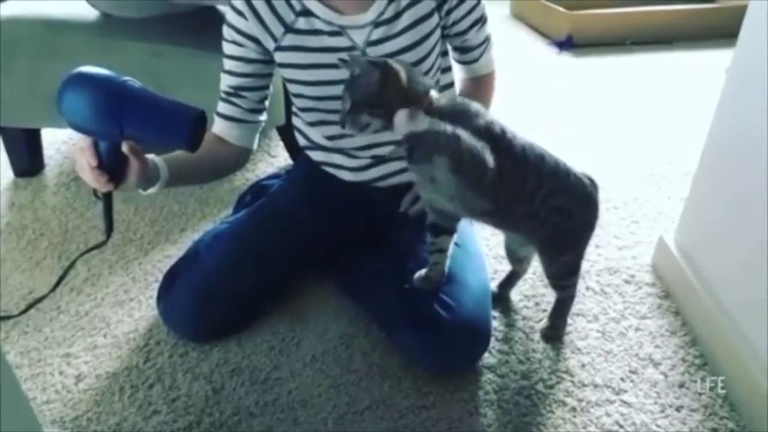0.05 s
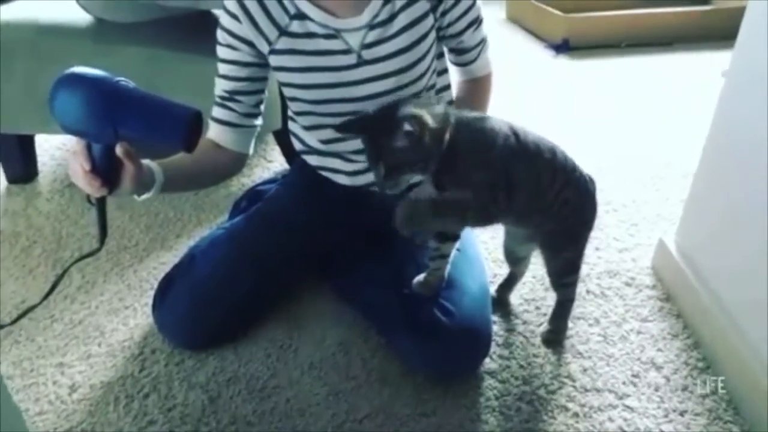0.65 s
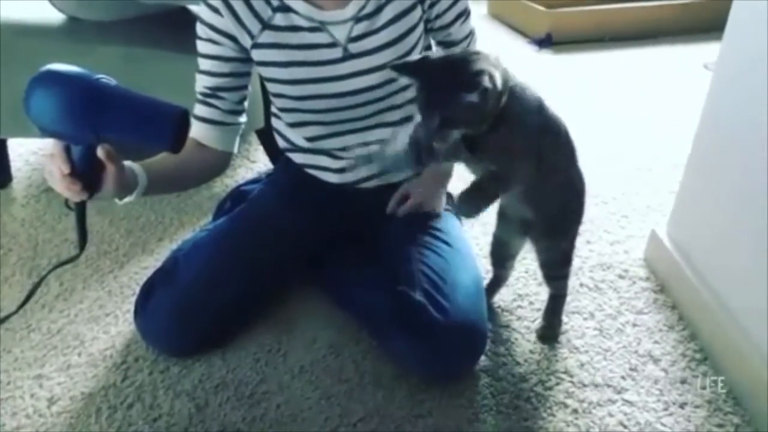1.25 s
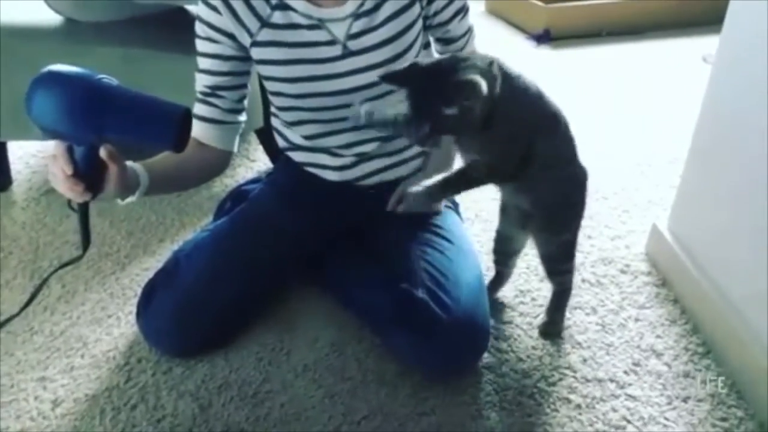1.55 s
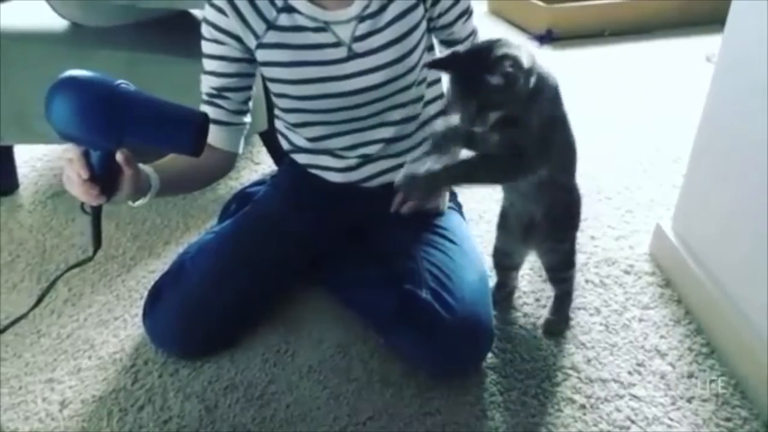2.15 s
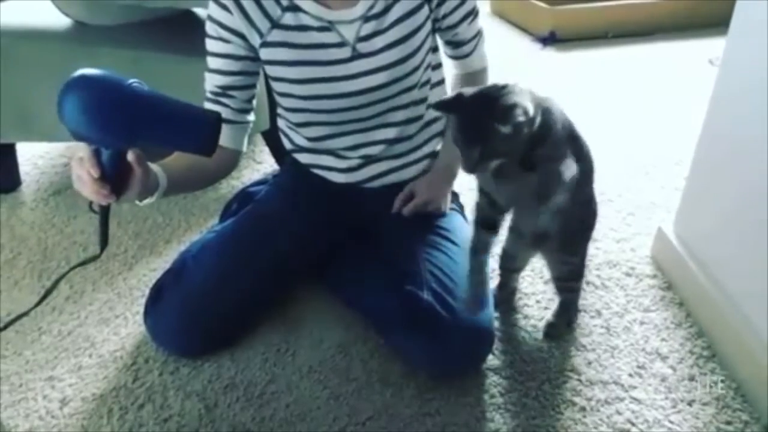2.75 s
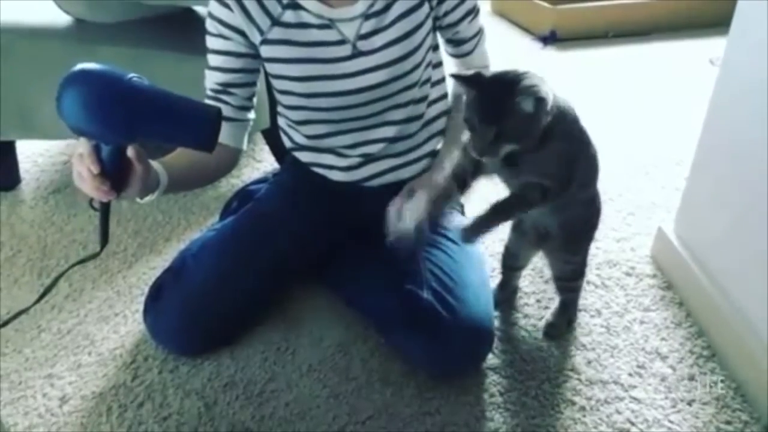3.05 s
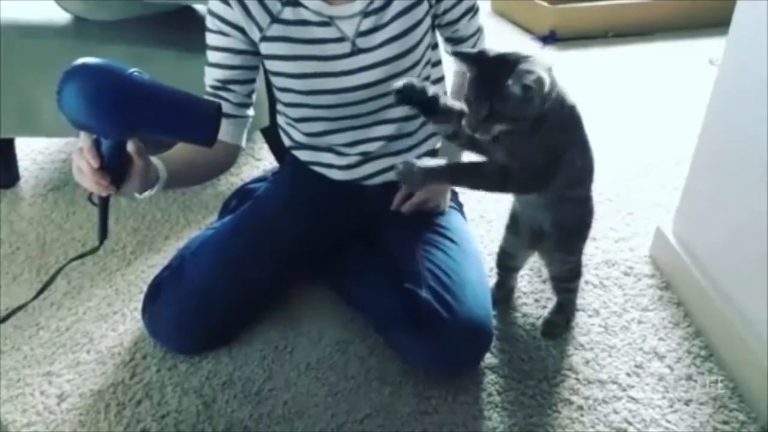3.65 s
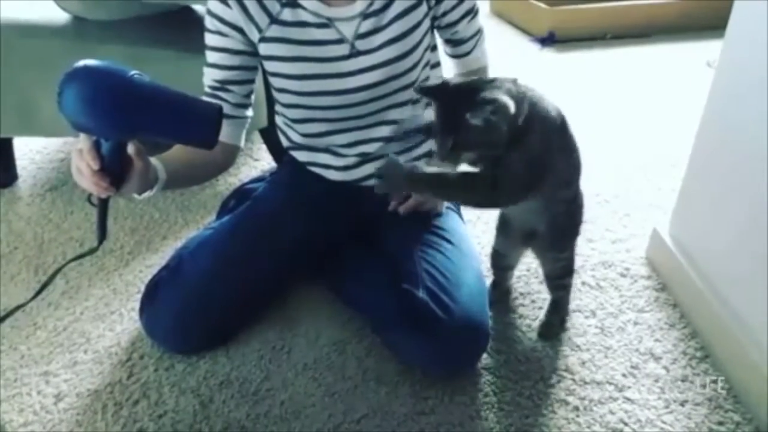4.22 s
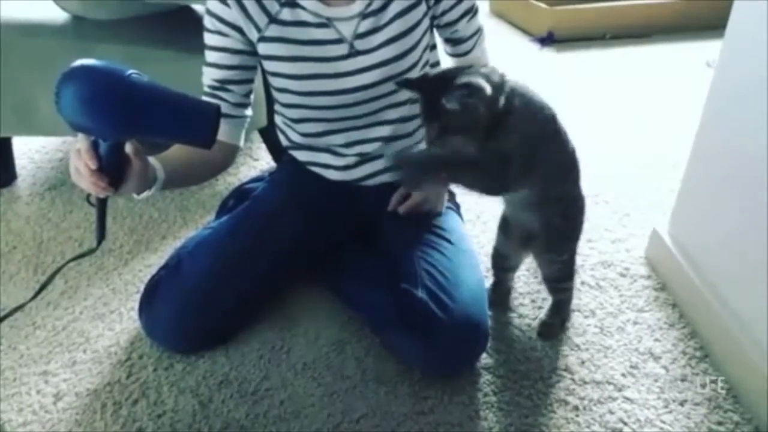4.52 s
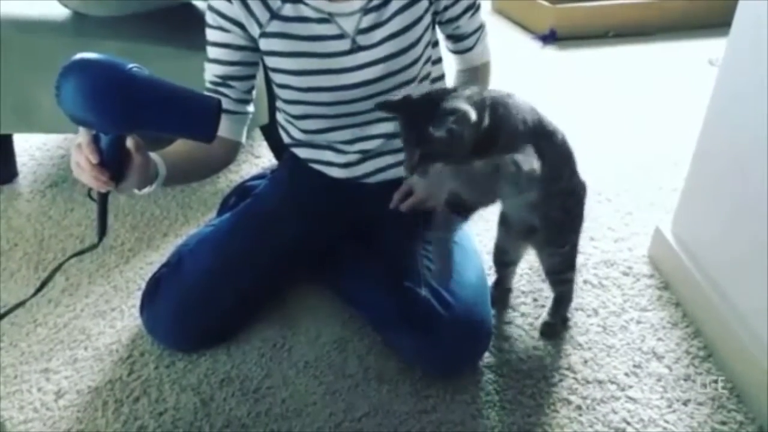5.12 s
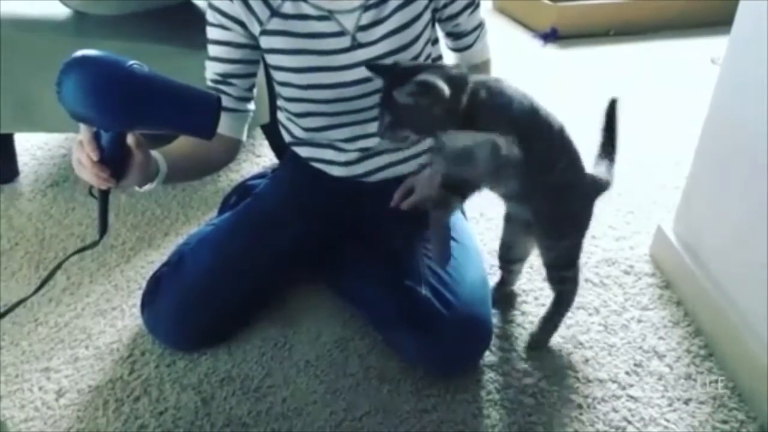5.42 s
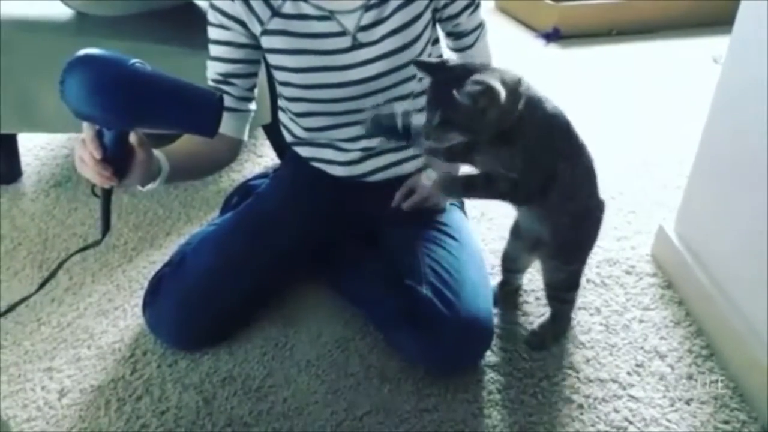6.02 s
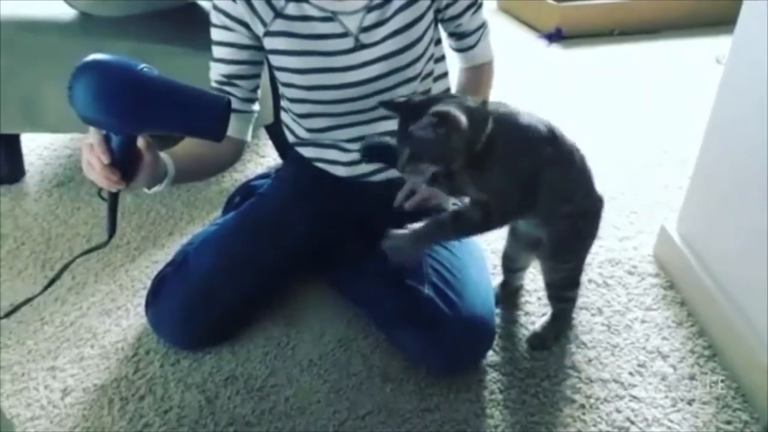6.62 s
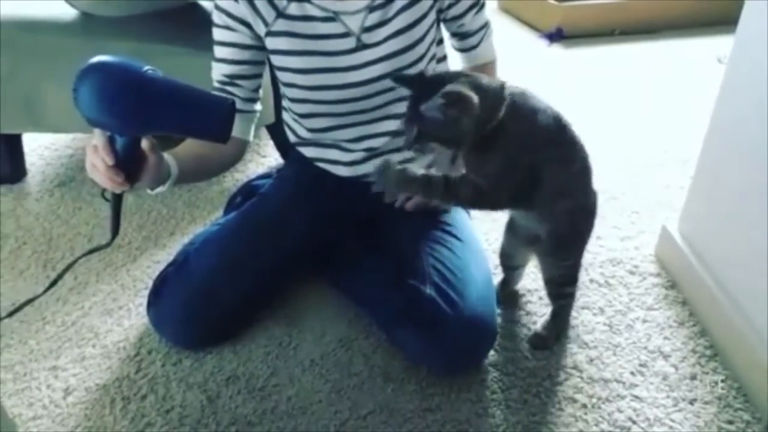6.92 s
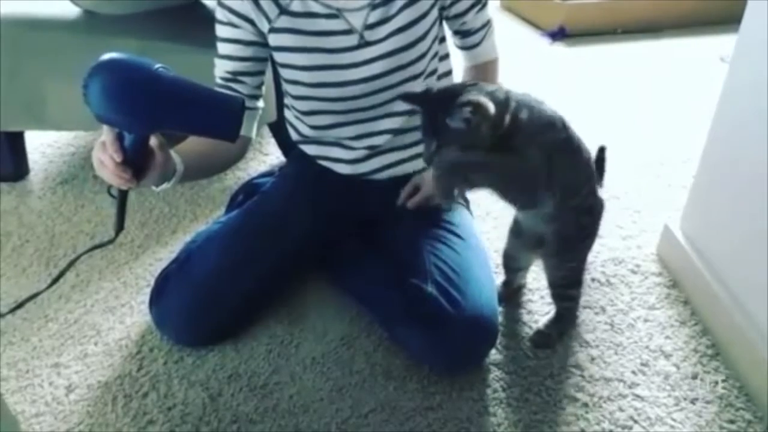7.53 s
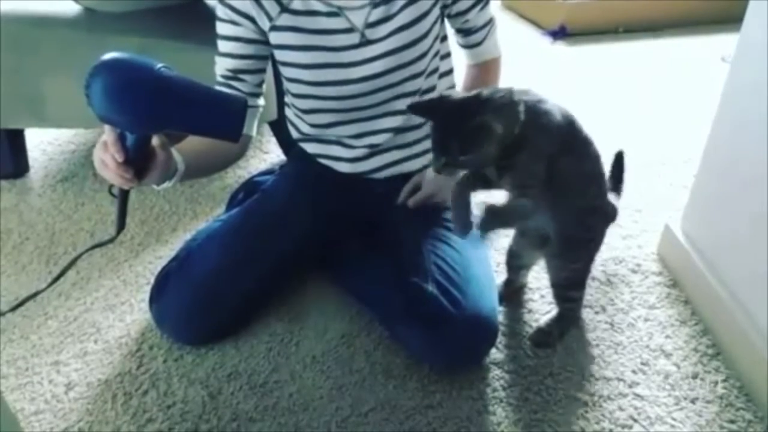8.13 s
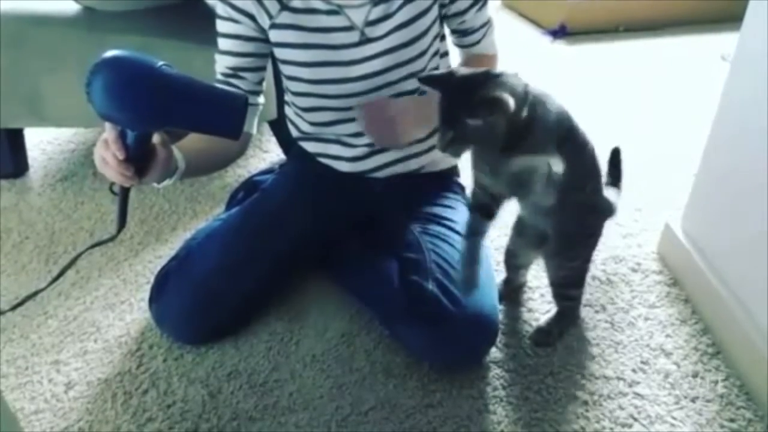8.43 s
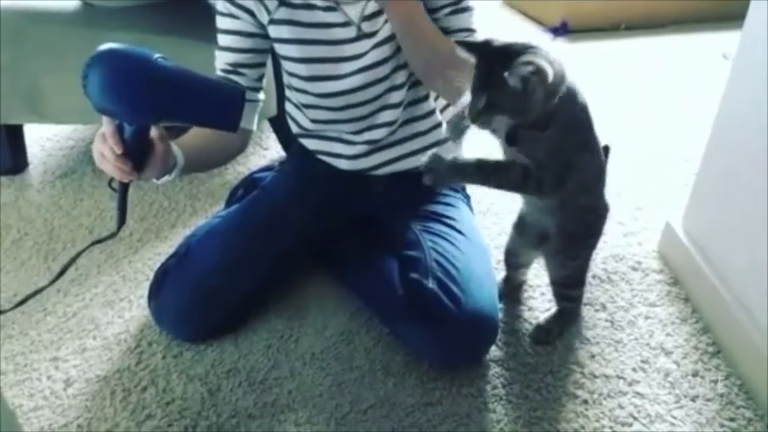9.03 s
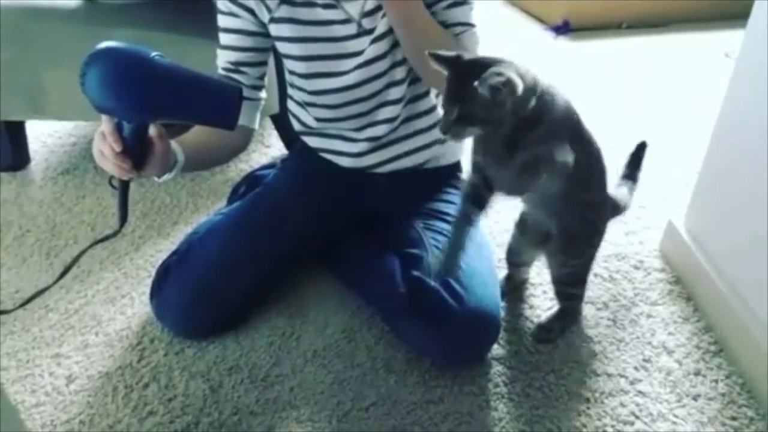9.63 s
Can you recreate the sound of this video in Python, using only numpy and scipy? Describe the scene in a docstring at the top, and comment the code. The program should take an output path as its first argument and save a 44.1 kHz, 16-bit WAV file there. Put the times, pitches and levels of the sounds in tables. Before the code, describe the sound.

Heard in mono from about a step away in a carpeted room, a hair dryer blows a constant, hissing rush of air from start to finish. A thin whine holds its pitch but wavers in strength, with a faint motor buzz and slight low flutters beneath it. Past the middle comes a single brief, soft swish, and the rush shifts slightly in tone as the dryer keeps running.

```python
"""A handheld hair dryer

A dryer runs steadily in a carpeted room, heard in mono from a step away. Turbulent air roars in its
barrel and hisses through its grille. One shaft drives the seven-bladed fan, which adds a thin whine
whose partials swell and fade, and the motor, which buzzes faintly. One short swish passes, and a faint
bass flickers under the rush."""
import sys
import numpy as np
from scipy import signal
from scipy.fft import rfft, irfft, next_fast_len
from scipy.io import wavfile
from scipy.ndimage import uniform_filter1d, map_coordinates

SR = 44100
rng = np.random.default_rng(int(sys.argv[2]) if len(sys.argv) > 2 else 0)


def store_pcm(level_fs):
    """Save levels as 16-bit WAV."""
    pcm = np.round(np.clip(level_fs, -1, 1) * 32767).astype(np.int16)
    wavfile.write(sys.argv[1], SR, np.atleast_2d(pcm).T)


N = 430857


def air_rush(roar_db=-38, hiss_db=-30.5):
    """Turbulent flow radiates broadband noise: roar and hiss add, each wavering slightly in level."""
    roar, hiss = barrel_roar(), grille_hiss()
    rush = amp(roar_db + 0.25 * wobble(12)) * roar + amp(hiss_db + 0.22 * wobble(12)) * hiss
    rush = drifting_midrange(nozzle_turn(rush))
    return fluttering_edge(rush, edge_hz=492.6, swing_hz=77.4, slope_hz=7.4)


# Broad spectrum of the roar. Each row: frequency in Hz, relative spectral level in dB.
ROAR_SPECTRUM = [(200.0, -42), (320.0, -6), (400.0, -10.5), (490.0, -6.5), (600.0, -2), (780.0, -5),
                 (900.0, -9), (1300.0, -5.5), (1600.0, -7), (2400.0, -32.5), (5000.0, -73)]
# Air resonances of the barrel. Each row: centre in Hz, width in Hz, lift in dB.
BARREL_MODES = [(605, 30, 1.8), (660, 80, 6.2), (705, 25, 2), (738, 24, 8.8), (778, 28, 5.3),
                (852, 26, 7.6), (940, 14, 2), (965, 16, 4), (1028, 22, 6.6), (1087, 19, 8.3), (1208, 45, 4),
                (1262, 18, 3.8), (1316, 20, 7.3), (1356, 13, 6), (1389, 14, 6), (1505, 30, 1.5),
                (1575, 35, 4.8)]

def barrel_roar():
    """Resonance: the air in the barrel reinforces the flow noise near its natural frequencies."""
    return eddies(noise(ROAR_SPECTRUM, BARREL_MODES), depth_db=1.5, frames=12)


# Broad spectrum of the hiss. Each row: frequency in Hz, relative spectral level in dB.
HISS_SPECTRUM = [(400.0, -80.0), (1000.0, -19.4), (1500.0, -6.3), (1800.0, 0.3), (2600.0, -0.9),
                 (3400.0, -2.3), (4700.0, -3.9), (7000.0, -4.6), (8550.0, -4.6), (8800.0, -8.1),
                 (11800.0, -10.9), (13300.0, -14.4), (14200.0, -18.6), (15400.0, -28.5)]
# Air resonances of the grille and dips between them. Each row: centre in Hz, width in Hz, gain in dB.
GRILLE_MODES = [(1470, 130, -1.3), (1760, 100, 1.3), (2007, 18, 4), (2066, 24, 6), (2160, 55, 3.6),
                (2315, 55, 3.2), (2405, 50, -2), (2495, 50, 1.8), (2610, 40, 1), (2730, 90, 2.7),
                (2885, 50, -1.5), (2989, 85, 4.6), (3130, 60, 3.8), (3215, 55, 2.3), (3330, 90, -1.8),
                (3619, 95, 3.2), (3950, 90, 2), (4100, 130, 4), (4205, 100, 3.7), (4330, 50, 1.8),
                (4600, 150, .8), (5170, 200, 1.5), (6020, 280, 2.3), (6520, 160, 1.2)]

def grille_hiss():
    """Turbulence at the grille makes bright noise, coloured by resonances and nearby reflections."""
    hiss = reflections(noise(HISS_SPECTRUM, GRILLE_MODES), echo_db=-24, count=4)
    return eddies(hiss, depth_db=1.0, frames=14)


# Drift of the hand that holds the dryer. Each row: time in seconds, sideways shift in metres.
HAND_DRIFT = [(0, 0), (.7, -.01), (1.1, -.04), (1.6, -.05), (2.4, .02), (6.3, .03), (7.8, .055),
              (9.77, .06)]
SOUND_M_PER_S = 343

def reflections(x, echo_db, count):
    """Comb filtering: weak echoes interfere with the direct sound, their delays moving with the hand."""
    t = np.arange(N) / SR
    shift_m, = curves(HAND_DRIFT)
    paths = zip(rng.uniform(.001, .006, count), rng.uniform(-1, 1, count))
    delays_s = [delay + lean * shift_m / SOUND_M_PER_S for delay, lean in paths]
    echoes = sum(map_coordinates(x, [(t - delay) * SR], mode="mirror") for delay in delays_s)
    return unit(x + amp(echo_db) * echoes)


def eddies(x, depth_db, frames):
    """Random amplitude modulation: eddies swell and thin each narrow band on its own."""
    spectra = signal.stft(x, nperseg=512)[2]
    swell = uniform_filter1d(rng.standard_normal(spectra.shape), size=3, axis=0)  # across frequency
    swell = uniform_filter1d(swell, size=frames, axis=1)  # across time
    return unit(signal.istft(spectra * amp(depth_db * unit(swell)), nperseg=512)[1][:N])


# Bands that change as the nozzle turns. Each row: centre in Hz, width in Hz, gain at full turn in dB.
NOZZLE_BANDS = [(755, 110, -1.2), (1490, 110, -1.8), (2090, 160, 1.8), (2410, 80, -1.8), (2650, 220, 1.7),
                (2950, 120, -1.5), (3200, 130, 1.5), (4440, 120, -1.5), (4870, 200, -1.8), (5130, 220, 2),
                (5500, 220, -2.5), (6120, 150, 1.3), (6420, 140, -1.5)]
# Aim of the nozzle. Each row: time in seconds, signed share of the full turn.
NOZZLE_AIM = [(0, -.3), (.8, -.6), (2.2, 0), (6.3, .15), (7.4, 1), (9.77, 1)]

def nozzle_turn(x):
    """Directivity: as the nozzle turns, some resonances stand out and the valleys between deepen."""
    turn, = curves(NOZZLE_AIM)
    return x + turn * filtered(x, lambda hz: amp(peaks_db(NOZZLE_BANDS, hz)) - 1)


# Colour of the rush. Each row: time in seconds, low-mid gain in dB, high-mid gain in dB.
MIDRANGE_GAINS = [(0, -1.7, 0), (1.5, -1.5, -0.3), (3.3, -0.9, -1.2), (4.5, -0.4, -1), (5.8, -1.3, -1),
                  (6.9, -0.5, -0.9), (7.5, 1, -1.5), (8.4, 1, -1.5), (9.77, 0.2, -2)]

def drifting_midrange(x):
    """Spectral balance shifts slowly: the lower midrange fills out as the upper thins."""
    low_mid_db, high_mid_db = curves(MIDRANGE_GAINS)
    x = band_gain(x, low_mid_db, centre_hz=1170, width_hz=650)
    return band_gain(x, high_mid_db, centre_hz=2000, width_hz=1200)


def fluttering_edge(x, edge_hz, swing_hz, slope_hz):
    """High-pass filtering: the roar falls away exponentially below a cutoff that flutters at random."""
    hz, t, spectra = signal.stft(x, SR, nperseg=1024, noverlap=768)
    cutoff_hz = np.interp(t * SR, np.arange(N), edge_hz + swing_hz * wobble(28))
    gain = np.exp(-np.maximum(cutoff_hz - hz[:, None], 0) / slope_hz)
    return signal.istft(spectra * gain, SR, nperseg=1024, noverlap=768)[1][:N]


# Whine as the nozzle turns. Each row: time in seconds, rms levels of blade tone and octave in dB.
WHINE_LEVELS = [(0.0, -44, -45), (0.3, -43.3, -47), (0.7, -43.3, -60), (0.92, -41, -46), (1.2, -44, -39.7),
                (2.5, -45.4, -39.8), (2.85, -45.8, -41), (4.3, -44.8, -38.7), (4.75, -43.8, -40.6),
                (5.1, -46, -41), (5.85, -46.4, -39.8), (6.5, -45.3, -44.5), (6.8, -46.2, -40.3),
                (7.6, -45.8, -40), (7.95, -45.6, -36.5), (8.12, -45.2, -40.7), (8.6, -44.8, -39),
                (8.9, -47.5, -37.3), (9.25, -47, -37.7), (9.77, -48.8, -37.3)]
# Upper partials of the whine. Each row: multiple of the blade tone, level in dB relative to UPPER_DB.
UPPER_PARTIALS = [(3, 0), (4, 2), (5, -2), (6, -10), (7, -5)]
BLADES, UPPER_DB = 7, -56

def fan_whine(angle):
    """Blades chop the air at the blade-passing frequency; uneven inflow makes each harmonic waver."""
    blade_db, octave_db = curves(WHINE_LEVELS)
    partials = [(1, blade_db + 1.3 * wobble(12)), (2, octave_db + 0.85 * wobble(8))]
    partials += [(k, UPPER_DB + db + 1.9 * wobble(2.0)) for k, db in UPPER_PARTIALS]
    return sum(tone(k * BLADES * angle, db) for k, db in partials)


# Partials of the motor. Each row: multiple of the shaft speed, rms level in dB.
MOTOR_PARTIALS = [(4, -60), (5, -64), (11, -64), (29, -60), (30, -62), (31, -66), (32, -64), (34, -62),
                  (36, -66), (37, -65), (39, -65), (41, -64), (45, -66), (47, -66)]

def motor_buzz(angle):
    """Periodic rotation gives a line spectrum: weak, wavering harmonics of the shaft speed."""
    return sum(tone(k * angle, db + 1.2 * wobble(6.9)) for k, db in MOTOR_PARTIALS)


# Motor speed, sagging slightly. Each row: time in seconds, speed in turns per second.
SHAFT_SPEED = [(0, 271.3), (1.3, 271.6), (3.5, 271.32), (6.6, 271.4), (8.9, 271.2), (9.5, 270.9),
               (9.77, 270.87)]

def shaft_angle():
    """Phase is the integral of frequency: the nearly steady speed sums to an angle in radians."""
    speed = curves(SHAFT_SPEED)[0] + 0.034 * wobble(14)
    return 2 * np.pi * np.cumsum(speed) / SR


def swish():
    """Flow noise of a passing obstacle, probably a cat's paw in the jet: one soft, falling swish."""
    return puff(start=6.62, length=.125, db=-44, from_hz=5000, to_hz=3450, width_hz=900)


# Puffs of bass. Each row: start in seconds, length in seconds, rms level in dB, centre in Hz.
BASS_PUFFS = [(0.043, 0.035, -57, 177), (0.142, 0.04, -66, 232), (0.21, 0.045, -59, 145),
              (0.276, 0.04, -59, 185), (0.615, 0.04, -60, 195), (0.679, 0.042, -59, 180),
              (2.686, 0.048, -58, 184), (2.948, 0.032, -63, 124), (3.534, 0.07, -60, 195),
              (3.88, 0.043, -67, 171), (4.245, 0.062, -59, 151), (4.477, 0.047, -63, 242),
              (4.587, 0.042, -62, 113), (4.756, 0.045, -57, 128), (5.395, 0.041, -58, 178),
              (5.477, 0.065, -59, 140), (5.907, 0.044, -64, 143), (5.996, 0.039, -58, 195),
              (6.23, 0.042, -62, 107), (6.823, 0.046, -62, 172), (6.93, 0.041, -60, 166),
              (7.081, 0.046, -64, 118), (7.334, 0.036, -58, 200), (7.443, 0.065, -58, 124),
              (7.721, 0.047, -62, 109), (7.803, 0.042, -63, 114), (7.911, 0.12, -59, 150),
              (8.09, 0.052, -57, 185), (9.041, 0.042, -64, 219), (9.26, 0.031, -58, 180),
              (9.403, 0.05, -67, 266), (9.637, 0.052, -64, 213)]

def bass_flicker(width_share):
    """Constant relative bandwidth: the bass flickers in soft puffs of noise, the higher ones wider."""
    return sum(puff(start, length, db, hz, hz, width_share * hz) for start, length, db, hz in BASS_PUFFS)


# Spectrum of the background. Each row: frequency in Hz, relative spectral level in dB.
FLOOR_SPECTRUM = [(20, -4), (70, -2), (130, -9), (400, -9), (2000, -30)]

def noise_floor():
    """Stationary noise, low in pitch and nearly silent, lies under everything."""
    return amp(-107) * noise(FLOOR_SPECTRUM)


def amp(db):
    """Amplitude ratio of a level in decibels."""
    return 10 ** (np.asarray(db) / 20)


def unit(x):
    """Normalisation to an rms of 1."""
    return x / np.sqrt(np.mean(x ** 2) + 1e-20)


def curves(rows):
    """Linear interpolation: one value per sample for each column after the time."""
    times, *columns = np.transpose(rows)
    return [np.interp(np.arange(N) / SR, times, column) for column in columns]


def wobble(rate):
    """Slow random modulation: a spline through rate random knots a second."""
    return map_coordinates(rng.standard_normal(int(N * rate / SR) + 4), [np.arange(N) * rate / SR])


def tone(phase, db):
    """A sinusoid of rms level db with a random starting phase."""
    return np.sqrt(2) * amp(db) * np.sin(phase + rng.uniform(0, 2 * np.pi))


def peaks_db(resonances, hz):
    """Lorentzian resonance curves, summed in decibels at each frequency."""
    return sum(lift / (1 + (2 * (hz - centre) / width) ** 2) for centre, width, lift in resonances)


def filtered(x, response):
    """Linear filtering: the spectrum of x is multiplied by a frequency response."""
    size = next_fast_len(N + 8192)
    return irfft(rfft(x, size) * response(np.fft.rfftfreq(size, 1 / SR)), size)[:N]


def band_gain(x, db, centre_hz, width_hz):
    """Equalisation: one broad, flat-topped band rises or falls with a level curve."""
    band = filtered(x, lambda hz: np.exp(-(2 * (hz - centre_hz) / width_hz) ** 4))
    return x + (amp(db) - 1) * band


def noise(spectrum, resonances=()):
    """Source and filter: white noise shaped by a broad spectrum and resonances, at an rms of 1."""
    size = next_fast_len(N + 8192)
    hz = np.fft.rfftfreq(size, 1 / SR)
    points_hz, levels_db = np.transpose(spectrum)
    db = np.interp(np.log(hz + 1), np.log(points_hz), levels_db) + peaks_db(resonances, hz)
    return unit(irfft(rfft(rng.standard_normal(size)) * amp(db), size)[:N])


def puff(start, length, db, from_hz, to_hz, width_hz):
    """Quadrature modulation of a gliding carrier gives a band of noise that swells and fades once."""
    first, age = round(start * SR), np.arange(round(length * SR)) / SR
    knots = rng.standard_normal((2, 256))
    in_phase, quadrature = (map_coordinates(row, [age * width_hz], mode="mirror") for row in knots)
    phase = 2 * np.pi * np.cumsum(np.linspace(from_hz, to_hz, len(age))) / SR
    band = in_phase * np.cos(phase) + quadrature * np.sin(phase)
    burst = unit(np.sin(np.pi * age / length) * band)
    return np.pad(amp(db) * burst, (max(first, 0), N))[:N]


def scene():
    """Superposition: the sources add into one signal, the same in both channels."""
    angle = shaft_angle()
    mono = air_rush() + swish() + fan_whine(angle) + motor_buzz(angle)
    mono += bass_flicker(width_share=1.0) + noise_floor()
    return np.array([mono, mono])


TOP_HZ = 15480

def record(dry):
    """Band limiting: an ideal low-pass filter removes everything above TOP_HZ."""
    return np.array([filtered(channel, lambda hz: hz < TOP_HZ) for channel in dry])


dry = scene()
out = record(dry)
store_pcm(out)
```